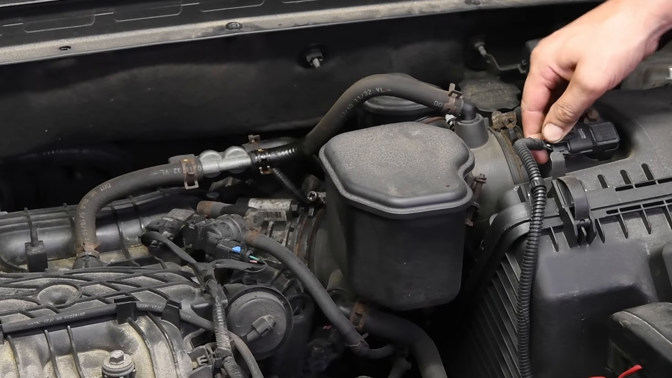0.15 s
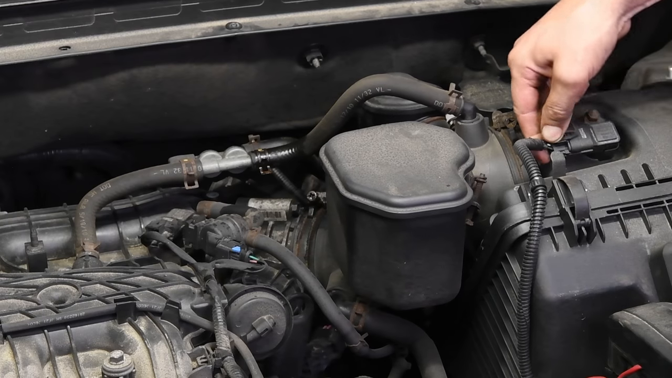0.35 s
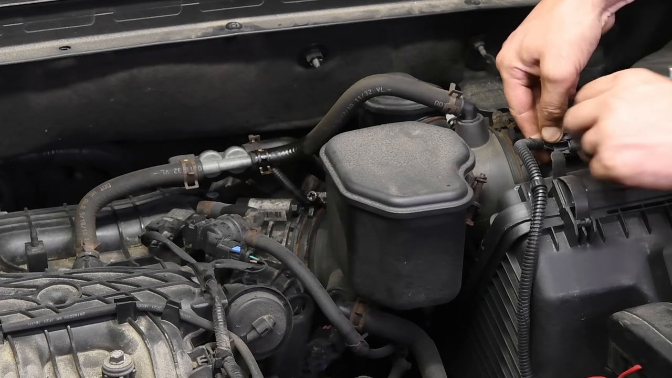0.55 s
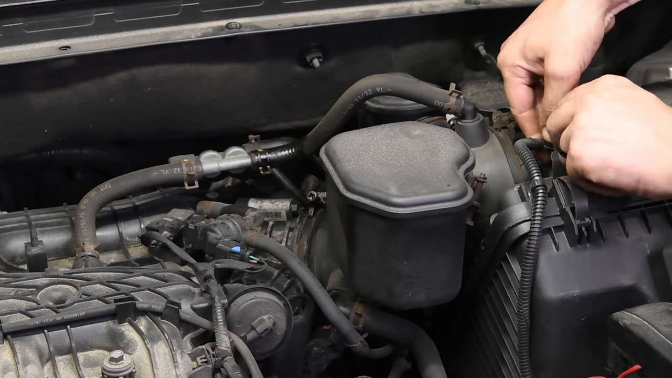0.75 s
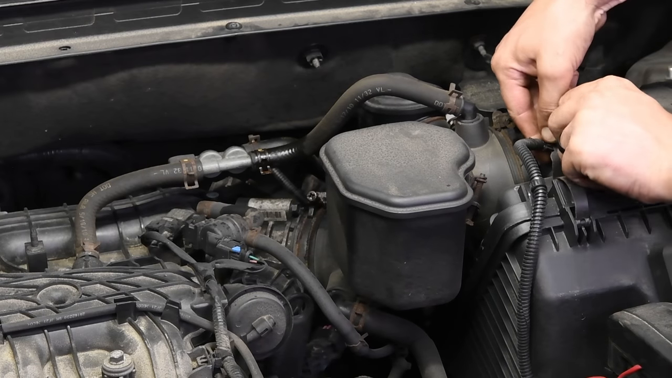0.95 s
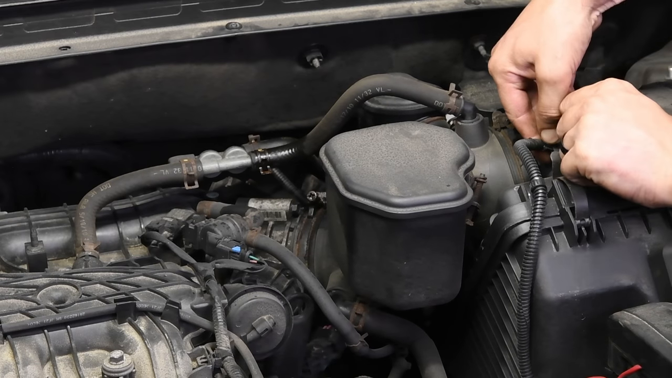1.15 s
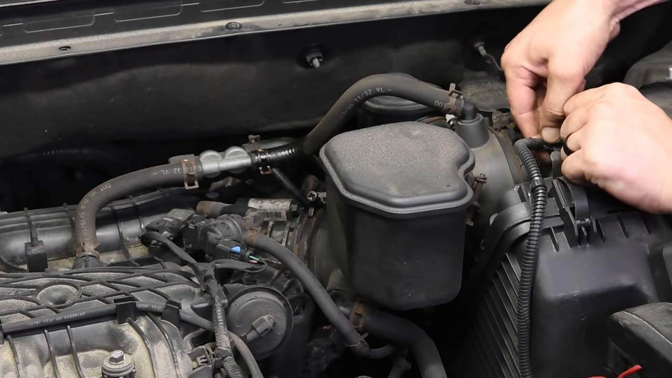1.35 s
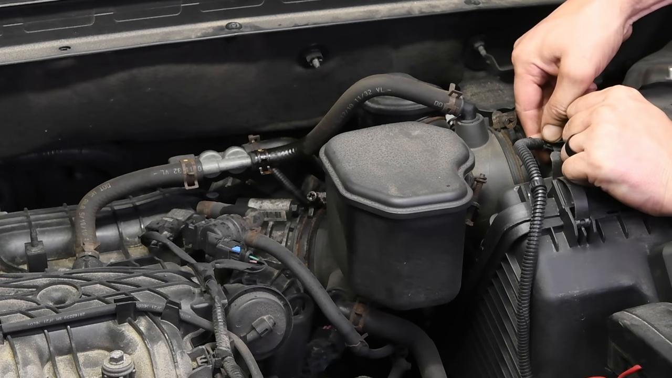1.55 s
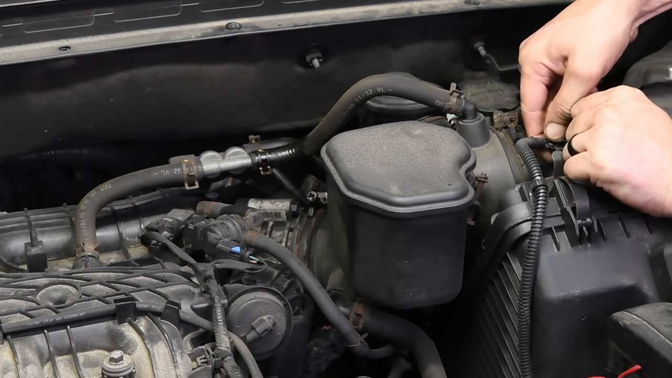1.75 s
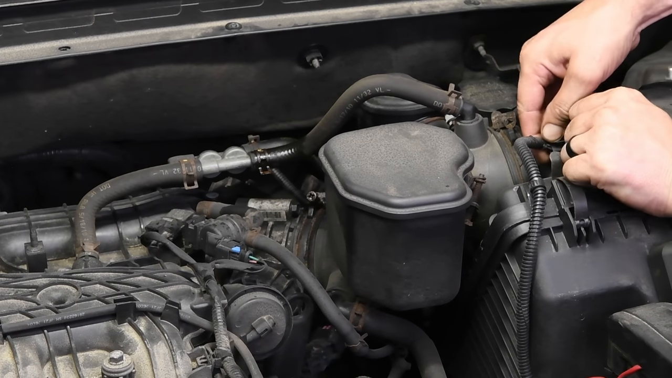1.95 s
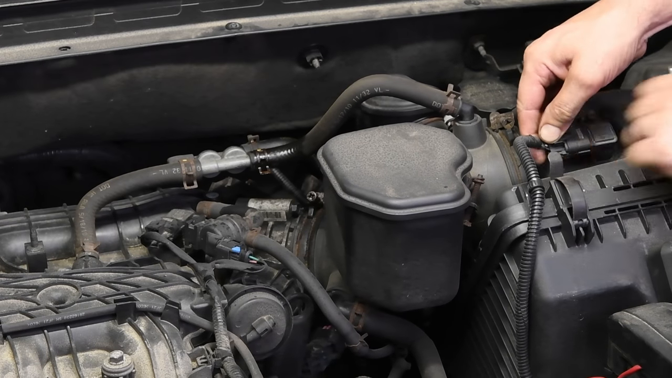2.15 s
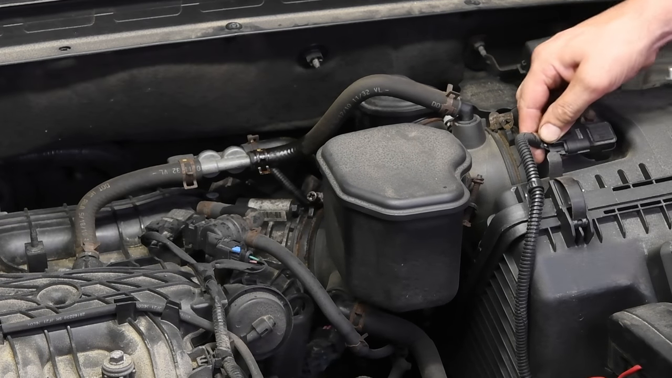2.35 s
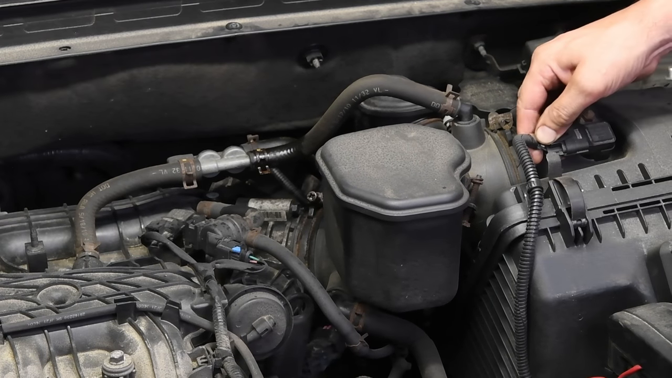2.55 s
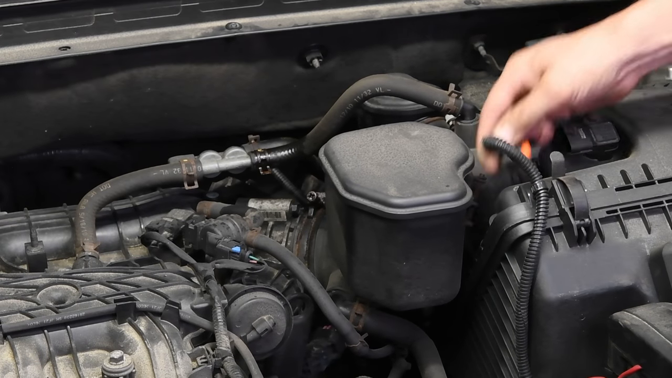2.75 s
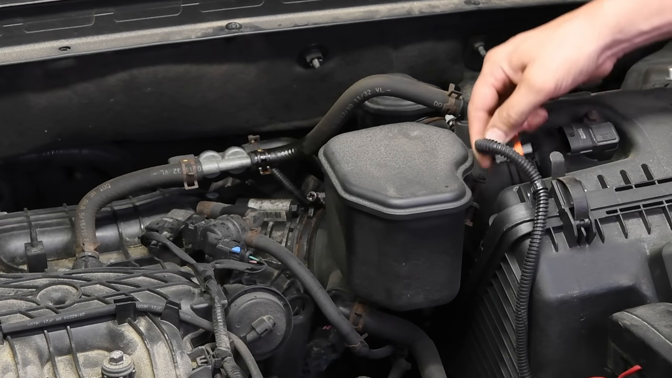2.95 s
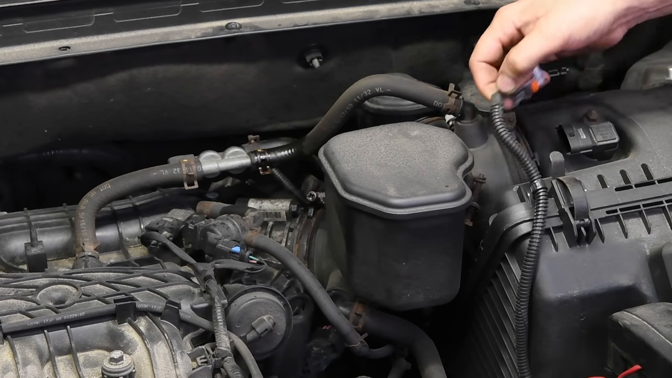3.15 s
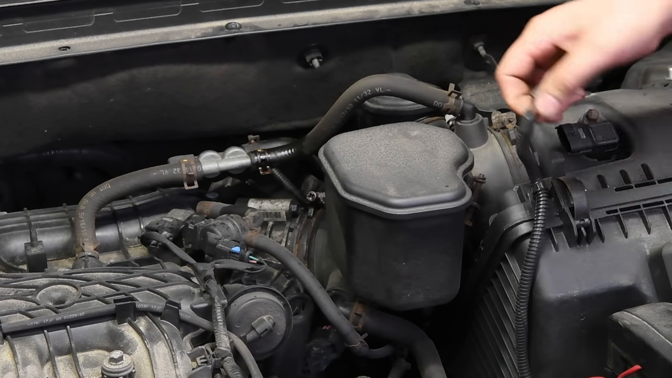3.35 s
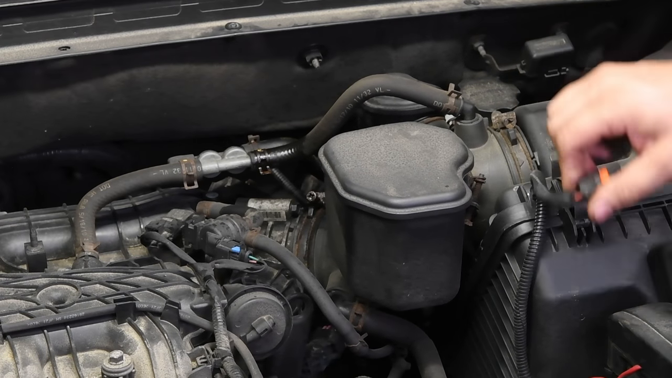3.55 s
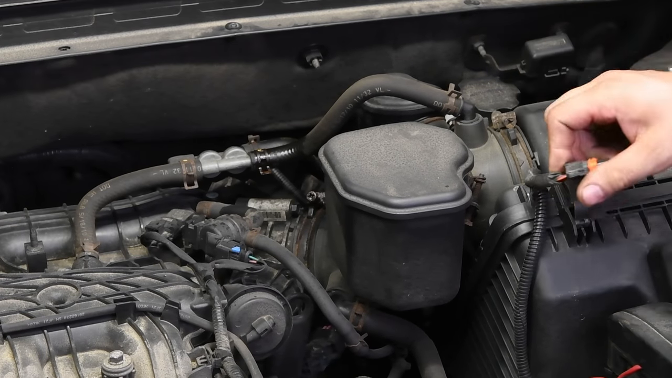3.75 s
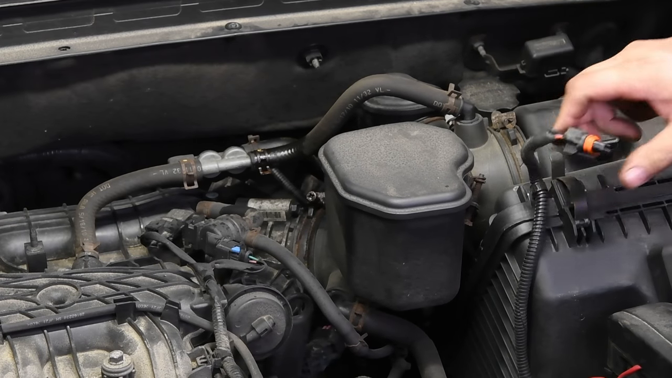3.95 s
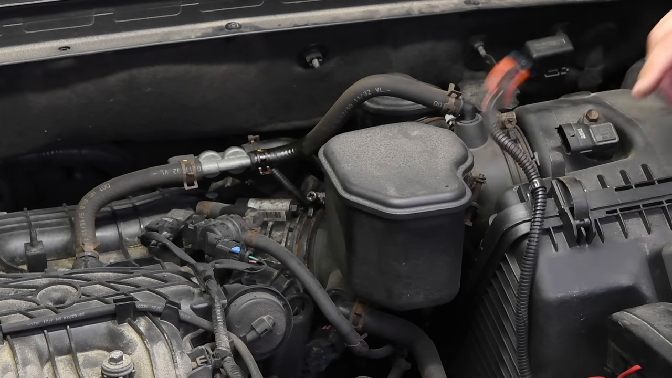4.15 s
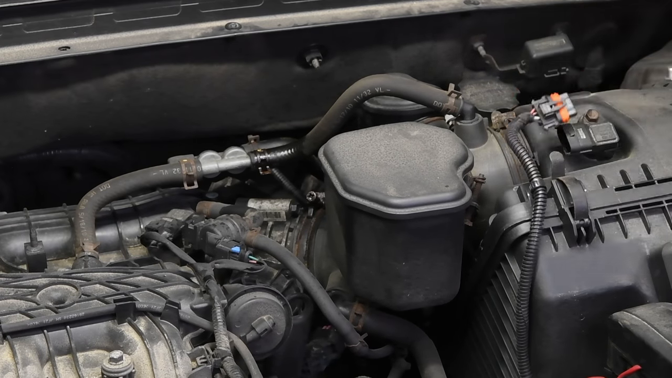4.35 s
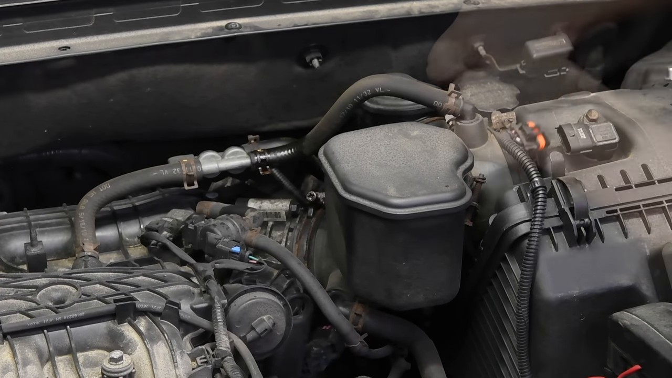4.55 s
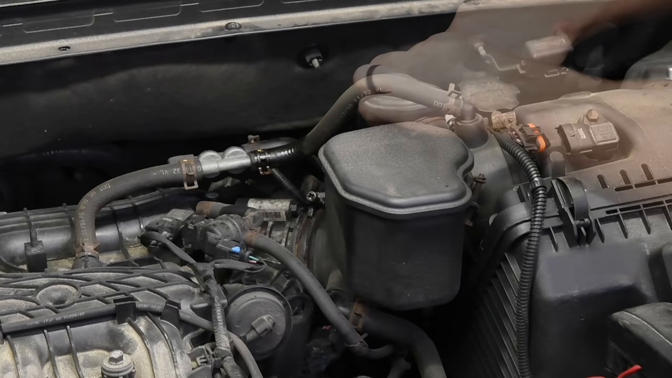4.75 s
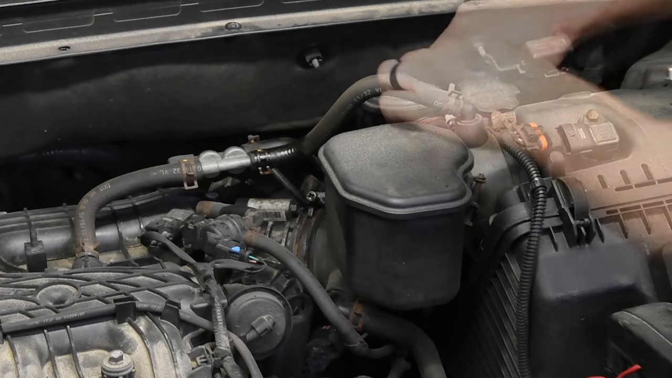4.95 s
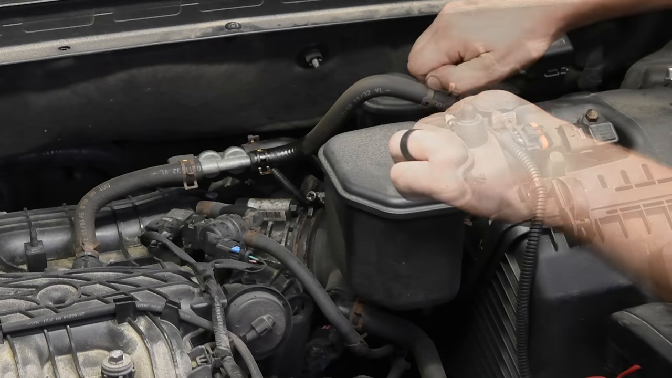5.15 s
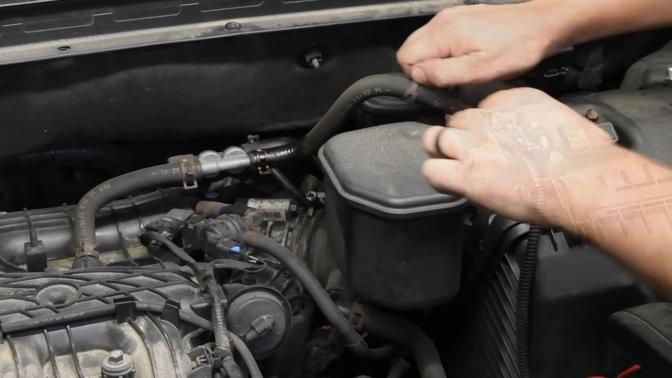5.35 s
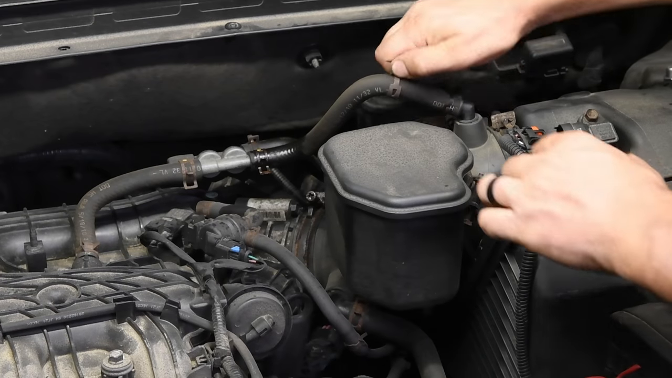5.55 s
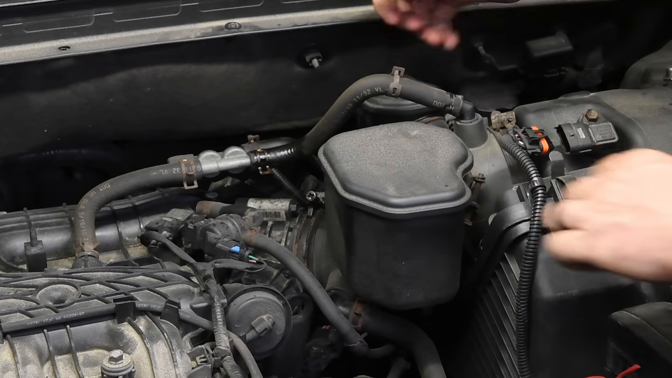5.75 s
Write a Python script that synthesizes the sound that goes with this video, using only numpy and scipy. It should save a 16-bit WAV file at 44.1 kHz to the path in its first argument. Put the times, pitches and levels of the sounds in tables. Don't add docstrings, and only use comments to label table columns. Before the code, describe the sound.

Hands work on a still engine in a workshop, heard close and centred. Light muffled taps lead to a bright plastic snap, a rapid hollow rattle, spaced single clicks, then a falling plug's clack and bounce. Quieter tapping and short hose drags follow. Low hiss runs throughout, with a distant, blurred cricket chirping about every half to one second.

```python
import sys
import numpy as np
from scipy import signal
from scipy.fft import rfft, irfft, next_fast_len
from scipy.io import wavfile
from scipy.ndimage import uniform_filter1d, map_coordinates

SR = 44100
rng = np.random.default_rng(int(sys.argv[2]) if len(sys.argv) > 2 else 0)


def log_audio(samples):
    frames = np.atleast_2d(samples).T
    limited = np.clip(frames, -1, 1)
    pcm = np.round(limited * 32767).astype(np.int16)
    wavfile.write(sys.argv[1], SR, pcm)


def boost(x):
    u = np.asarray(x, float) / 20
    return 10 ** u


N = 259749
SPAN = 16384
CLOCK = np.arange(SPAN) / SR
HZ = np.fft.rfftfreq(SPAN, 1 / SR)

# frequency [Hz], density [dB per Hz].
HISS_COLOUR = [(12, -56), (20, -42), (38, -7.5), (131, 0), (184, -8.5), (351, -10), (690, -8), (750, -10.5),
               (1280, -11.5), (2440, -10), (12100, -12.5), (15800, -13), (15950, -70)]
# frequency [Hz], density [dB per Hz].
SIDE_HISS_COLOUR = [(12, -38), (32, -8), (108, -7), (135, -3), (184, -4.5), (465, -6.5), (634, -7.5),
                    (709, -8), (4280, -10), (15800, -11.5), (15950, -70)]

# time [s], level [dB].
RUB_PRESSURE = [(0, -68), (.2, -72.5), (.45, -67.5), (.6, -72), (.92, -70.5), (1.02, -74.5), (1.85, -69.5),
                (2.58, -71.5), (2.76, -56), (3.05, -72), (4.1, -74), (4.3, -65.5), (4.55, -71.5),
                (4.8, -70), (4.95, -69), (5.38, -68), (5.5, -69), (5.8, -73.5), (5.89, -75.5)]
# resonance [Hz], width [Hz], level [dB].
BOX_RESONANCES = [(200, 95, 0.5), (405, 113, 3.5), (575, 300, -2), (960, 290, -3.5), (1260, 82, -1.5),
                  (1660, 760, -10)]
# frequency [Hz], density [dB per Hz].
SKIN_COLOUR = [(500, -2), (2000, 3), (4000, 1.5), (9000, -3), (15700, -25), (15950, -70)]
# frequency [Hz], density [dB per Hz].
CLOTH_COLOUR = [(2500, -12), (6000, -6), (8000, -4), (15700, -9), (15950, -70)]
# start of full level [s], hold [s], level [dB].
SKIN_SLIDES = [(.165, 0.11, -71), (.47, 0.05, -76), (2.0, 0.0035, -66), (2.045, 0.0043, -71),
               (2.815, 0.015, -70), (2.98, .004, -75), (5.35, 0.062, -75), (5.5, 0.0046, -79)]
# start of full level [s], hold [s], level [dB].
HOSE_DRAGS = [(1.896, .004, -60), (1.99, 0.0043, -78), (2.104, .004, -88), (4.906, 0.0024, -58),
              (5.064, 0.013, -58), (5.09, 0.29, -75), (5.33, 0.17, -74), (5.66, 0.0026, -54)]
# start of full level [s], hold [s], level [dB].
SLEEVE_WHISKS = [(4.066, 0.081, -63.5)]

# start [s], cavity peak [dB], cavity pitch [Hz], wall peak [dB], wall pitch [Hz].
PLUG_TAPS = [(0.022, -46.5, 448, -49.5, 1260), (0.214, -56.5, 444, -73, 740), (0.653, -69, 740, -57, 860),
             (0.662, -62, 438, -50.5, 860), (0.082, -63, 415, -72, 900), (1.233, -80, 423, -62.5, 853),
             (2.255, -61, 590, -60, 1000), (0.883, -58, 470, -57, 985), (0.912, -62, 680, -65, 895),
             (0.79, -53.5, 415, -48, 875), (0.868, -57, 422, -57, 780), (0.895, -54, 705, -75, 1010),
             (1.4349, -46.5, 450, -51.5, 820), (1.441, -54.5, 423, -69, 796),
             (1.543, -54.5, 500, -80, 1180), (1.887, -50, 436, -73, 880), (1.983, -50, 442, -54, 1060),
             (2.039, -53.5, 395, -56, 1060), (2.09, -49.5, 418, -65, 750), (2.194, -52.5, 443, -57, 1090),
             (2.203, -57, 494.6, -65, 900), (2.225, -56.5, 614, -50.5, 1080), (2.449, -65, 332, -59, 1060),
             (2.952, -63, 333, -55, 1080), (2.968, -56.5, 334, -51, 1290), (2.983, -57, 350, -56, 1100)]
# start [s], cavity peak [dB], cavity pitch [Hz], wall peak [dB], wall pitch [Hz].
HOSE_TAPS = [(4.697, -69, 777, -57, 915), (4.744, -68, 400, -55.5, 974), (4.763, -55, 474, -45, 960),
             (4.773, -50, 390.4, -58, 990), (4.834, -60, 200, -59, 1000), (4.995, -63, 380, -60, 1270),
             (4.892, -67, 400, -48.5, 970), (5.005, -62, 363, -66, 985), (5.045, -74, 380, -53, 920),
             (5.099, -55.5, 374, -59, 1140), (5.254, -72, 398, -65, 1270), (5.307, -69, 403, -64, 1250),
             (5.498, -65, 744, -52.5, 1010), (5.559, -53.5, 400, -52, 1266), (5.567, -57, 303, -54, 1010),
             (5.626, -45.5, 385, -48, 1100), (5.639, -49.5, 370, -64, 730)]
# start [s], cavity peak [dB], cavity pitch [Hz], wall peak [dB], chatter t60 [s].
PLUG_BLOWS = [(1.685, -37, 704, -28.5, 0.0069), (1.692, -30, 467, -54, 0.029),
              (2.627, -51.5, 408, -56, 0.046), (2.654, -42, 710, -39, 0.018), (2.664, -37, 507, -40, .04),
              (2.669, -34, 584, -26, 0.05), (2.678, -27, 418, -42, 0.033), (2.692, -35, 460, -62, 0.022),
              (2.703, -38, 537, -52, 0.046), (2.74, -50, 457, -64, 0.024), (2.787, -51, 300, -56, 0.026),
              (2.797, -43.5, 197, -68, 0.064), (2.809, -44, 517, -55, 0.011),
              (2.826, -47.5, 416, -63, 0.024), (2.831, -52, 714, -62, 0.011),
              (2.889, -47.5, 476, -70, 0.014), (2.906, -47.5, 326, -73, 0.038),
              (4.2, -35.5, 431, -27.5, 0.035), (4.2165, -37.5, 400, -31.5, 0.084),
              (4.259, -50, 603, -53, 0.011), (4.409, -32.5, 680, -35.5, 0.022),
              (4.416, -37, 630, -47, 0.023), (4.427, -37, 623, -38, 0.028), (4.434, -33, 593, -49, 0.037)]

# (start [s], peak [dB], chatter t60 [s]).
FINGER_TICKS = [
    ([(1760, -47), (3000, -1), (5620, 4), (10400, 1), (12800, 5), (16500, -13)], [(1.1727, -41, 0.027), (1.9839, -48.5, 0.033), (2.0911, -52.5, 0.039)]),
    ([(880, -27), (1500, -7), (2330, -16.5), (3740, -8.5), (6050, -16.5), (13000, -21.5), (15200, -28), (16500, -47)], [(.0235, -44, 0.033), (0.0275, -38.5, 0.03)]),
    ([(900, -13), (1600, 2), (2300, -7), (3600, -3.5), (5000, -13), (8000, -17), (16500, -30.5)], [(0.6614, -58, 0.02), (0.7954, -59, 0.018), (0.8744, -55, 0.018), (2.1974, -54, 0.023), (2.2283, -55, 0.031), (2.6269, -56, 0.053), (4.7656, -40, 0.01), (4.8928, -51, 0.031), (5.0459, -52, 0.021), (5.5624, -53, 0.019), (5.6271, -47, 0.026)]),
]
# [s, dB, s].
UNPLUGGING = [
    ([(1000, -9), (1540, -32), (1800, -1.5), (2240, 1), (2980, -3.5), (3280, -1.5), (4700, -12.5), (6880, -1), (8810, -10.5), (12900, -6), (15000, -14), (16500, -62)], [(1.6856, -10.5, 0.012), (1.6866, -18, 0.024)]),
    ([(1000, -6.5), (1700, 0.5), (2330, -0.5), (3600, -10.5), (4360, -4.5), (4750, -8.5), (6440, -12.5), (7150, -18), (13800, -22.5), (15600, -32), (16500, -65)], [(2.6535, -40, 0.0084), (2.6556, -28.5, 0.019), (2.6644, -29.5, 0.037), (2.6718, -17.5, 0.031), (2.7342, -42, 0.03), (2.8994, -49, 0.017)]),
    ([(710, -48), (1200, -6.5), (1530, -18), (2100, -19), (3000, 2), (3400, 0.5), (3900, -8), (5200, -6), (7700, -7.5), (9500, -10.5), (11400, -16.5), (16000, -24), (16500, -41)], [(2.7687, -16, 0.012), (2.7715, -34.5, 0.037), (2.797, -17, 0.01), (2.7995, -30, 0.032)]),
]
# [s, dB, s].
CARRYING = [
    ([(350, -69), (600, -27.5), (2030, -26), (2470, -8.5), (2920, -14.5), (3900, 4.5), (4300, -8), (4940, -4.5), (7380, -6.5), (10400, -20), (12000, -13), (15400, -23), (16500, -53)], [(3.1627, -13, 0.0085), (3.1638, -16, 0.021), (3.4574, -53, 0.028)]),
    ([(350, -61), (600, -33), (2800, -17.5), (3170, -4), (4670, -4), (5370, 2.5), (7490, -1.5), (8480, -13.5), (11200, -8), (14600, -20), (16500, -39)], [(3.5698, -17.5, 0.018)]),
    ([(350, -58), (600, -23.5), (1670, -22.5), (2650, -23), (3260, -5), (4870, 2.5), (6340, -3.5), (7280, 1), (9880, -9), (11300, -19.5), (14000, -17), (16500, -34)], [(4.1042, -48, 0.018), (4.1358, -52, 0.012), (4.1374, -11.5, 0.017)]),
]
# [s, dB, s].
DROPPING = [
    ([(1000, -36), (1700, 15.5), (2460, -7), (2730, 6.5), (4200, -15), (5070, 1), (6690, -6), (11200, -3.5), (15100, -33), (16500, -53)], [(4.2004, -26.5, 0.029), (4.2168, -40, 0.018)]),
    ([(880, -39), (1500, 2), (2260, 4), (2530, -7), (3590, -12), (4570, 3.5), (5530, -10.5), (8260, -13.5), (9690, -9.5), (10500, -23), (12800, -13), (16500, -51)], [(4.4094, -18.5, 0.019)]),
    ([(880, -11), (1500, -3), (3450, -11), (4480, -18), (5640, -12), (11500, -16), (15700, -36), (16500, -41)], [(4.4278, -26.5, 0.013)]),
]

# frequency [Hz], t60 [s].
SHOP_T60 = [(200, 0.17), (600, 0.34), (2000, 0.47), (5000, 0.49), (9000, 0.41), (15000, 0.24)]
# frequency [Hz], room share [dB].
SHOP_SHARE = [(200, -4.5), (600, -10), (2000, -15), (5000, -15), (9000, -19.5), (15300, -15.5),
              (15800, -70)]
# frequency [Hz], side share of the room [dB].
SHOP_WIDTH = [(200, -35), (1000, -51), (4000, -39), (12000, -31)]

# first wing stroke [s], last stroke [dB], strokes until the loudest,
# level [dB].
CHIRPS = [(0.227, -14, 2.9, -58), (0.931, -3.5, 2.6, -57), (1.348, -1.5, 2, -58.5), (2.241, -1.5, 3, -57),
          (3.019, -9, 2.2, -58.5), (3.812, -1, 2.1, -57.5), (4.537, 4, 1.6, -60), (5.169, -0.5, 2.5, -57)]

# start [s], peak [dB], pitch [Hz], width [Hz], chatter t60 [s].
BOOMS = [(.791, -61.5, 2290, 150, .06), (1.4357, -54.5, 237, 86.4, 0.066),
         (1.6856, -24.5, 1010, 224, 0.0074), (1.692, -40.5, 340, 96, 0.03), (1.704, -46.5, 592, 45, 0.27),
         (1.79, -58, 600, 35, 0.25), (2.629, -45, 210, 120, .1), (2.675, -38, 191, 80, 0.092),
         (2.681, -37.5, 327, 100, 0.1), (2.829, -45, 560, 400, .01), (2.865, -54, 600, 300, 0.0079),
         (2.8831, -44, 377, 300, 0.0039), (3.1665, -58, 205, 120, .14), (3.169, -52, 3600, 300, .5),
         (3.172, -55, 3950, 350, .42), (3.168, -45, 4970, 500, 0.41), (3.181, -54, 5200, 280, .5),
         (4.2008, -28.5, 1100, 250, 0.026), (4.2026, -40.5, 190, 86.5, .11), (4.204, -37, 400, 162, 0.031),
         (4.216, -30.5, 1450, 600, 0.054), (4.4105, -48, 2200, 300, .045), (4.413, -53, 4480, 200, 0.29),
         (4.416, -46, 460, 88, 0.17), (4.422, -53, 2550, 200, 0.38), (4.437, -44.5, 620, 45, 0.5),
         (4.773, -58, 200, 97, .14), (5.061, -58.5, 1280, 120, 0.24), (5.565, -51.5, 175, 110, 0.053),
         (5.643, -46, 171, 86, 0.043)]


def unit(x):
    return x / np.sqrt(np.mean(x ** 2) + 1e-20)


def along(points, hz):
    f, v = np.transpose(points)
    return np.interp(np.log(hz + 1), np.log(f + 1), v)


def curve(rows, column):
    rows = np.asarray(rows)
    return np.interp(np.arange(N) / SR, rows[:, 0], rows[:, column], left=-120, right=-120)


def swells(rows, rise_db_per_s, fade_db_per_s):
    t = np.arange(N) / SR
    gain = np.zeros(N)
    for s, hold, db in rows:
        before = np.clip(s - t, 0, 1)
        after = np.clip(t - s - hold, 0, 1)
        gain += boost(db - rise_db_per_s * before - fade_db_per_s * after)
    return gain


def modes(peaks, f):
    total = 0
    for k, (centre, width, db) in enumerate(peaks):
        damping = 1j * f * width
        total = total + (-1) ** k * boost(db) * damping / (centre * centre - f * f + damping)
    return total


def high_pass(hz):
    return (1j * HZ / (hz + 1j * HZ)) ** 3


def causal(gain):
    ceps = irfft(np.log(gain + 1e-6))
    ceps[1:SPAN // 2] *= 2
    ceps[SPAN // 2 + 1:] = 0
    return np.exp(rfft(ceps))


def noise(response):
    m = next_fast_len(N)
    colour = response(np.fft.rfftfreq(m, 1 / SR))
    return unit(irfft(rfft(rng.standard_normal(m)) * colour, m)[:N])


def wobble(rate):
    knots = rng.standard_normal(int(N * rate / SR) + 4)
    return map_coordinates(knots, [np.arange(N) * rate / SR])


def struck(response, t60, blow, rise):
    chatter = rng.standard_normal(SPAN) * boost(-60 * CLOCK / max(t60, .002))
    chatter *= 1 - np.exp(-CLOCK / max(rise, 1e-5))
    chatter[0] += blow
    chatter = rfft(chatter)
    even = causal(np.sqrt(np.abs(uniform_filter1d(np.abs(chatter) ** 2, size=90))))
    ring = irfft(chatter / even * response)
    return ring / np.abs(ring).max()


def add(out, s, x):
    hz, t, z = signal.stft(rng.standard_normal((2, SPAN)), SR, nperseg=256)
    t60 = along(SHOP_T60, hz)[:, None]
    decay = boost(along(SHOP_SHARE, hz)[:, None] - 60 * t / t60)
    z = z * decay / np.sqrt(t60 * SR / np.log(1e6))
    z[1] *= boost(along(SHOP_WIDTH, hz))[:, None]
    tail = signal.istft(z, SR, nperseg=256)[1][:, :SPAN]
    tail[0, :200] = 0
    tail[:, 0] = 1, boost(-85)
    start = round((s + .0005) * SR)
    out[:, start:][:, :2 * SPAN - 1] += signal.fftconvolve(x[None], tail, axes=1)


def hiss():
    level_db = -66
    mid = boost(level_db - 1) * noise(lambda f: boost(along(HISS_COLOUR, f)))
    side = boost(level_db - 1.5) * noise(lambda f: boost(along(SIDE_HISS_COLOUR, f)))
    return np.array([mid, side])


def rubbing():
    box = noise(lambda f: modes(BOX_RESONANCES, f)) * boost(2.5 * wobble(35))
    hose = noise(lambda f: modes([(390.0, 46, 0)], f) ** 2)
    skin = noise(lambda f: boost(along(SKIN_COLOUR, f))) * boost(0.91 * wobble(44))
    cloth = noise(lambda f: boost(along(CLOTH_COLOUR, f))) * boost(4.7 * wobble(72))
    out = boost(curve(RUB_PRESSURE, column=1)) * unit(box)
    out += swells(SLEEVE_WHISKS, rise_db_per_s=141, fade_db_per_s=820) * unit(cloth)
    out += swells(HOSE_DRAGS, rise_db_per_s=1400, fade_db_per_s=580) * hose
    out += boost(5.0) * swells(SKIN_SLIDES, rise_db_per_s=950, fade_db_per_s=1500) * unit(skin)
    return out


def knocks(out_len):
    out = np.zeros((2, out_len))
    soft_s, hard_s = 0.0017, 0.00015
    top_wall_hz = 948
    contacts = [(*row, 0.031, soft_s) for row in PLUG_TAPS]
    contacts += [(*row, 0.027, soft_s) for row in HOSE_TAPS]
    contacts += [(*row[:4], top_wall_hz, row[4], hard_s) for row in PLUG_BLOWS]
    for s, db, cavity_hz, wall_db, wall_hz, t60, rise in contacts:
        cavity = modes([(cavity_hz, 50, 0), (410, 70, -10), (610, 80, -12)], HZ) * high_pass(87)
        wall = modes([(wall_hz, 250, 0), (1.34 * wall_hz, 400, -10)], HZ)
        wall = wall * modes([(wall_hz, 1200, 0)], HZ)
        air = boost(db) * struck(cavity, t60, blow=6 * hard_s / rise, rise=2 * rise)
        plastic = boost(wall_db - 0.5) * struck(wall, t60, blow=hard_s / rise, rise=rise)
        add(out, s, air + plastic)
    return out


def snaps(out_len):
    out = np.zeros((2, out_len))
    for colour, contacts in FINGER_TICKS + UNPLUGGING + CARRYING + DROPPING:
        body = causal(boost(along(colour, HZ))) * high_pass(colour[0][0])
        for s, db, t60 in contacts:
            add(out, s, boost(db) * struck(body, t60, blow=4.23, rise=0.0001))
    return out


def cricket(count=4):
    stroke_every_s, stroke_s, rise_s, stroke_t60_s = .044, 0.04, 0.0039, 0.29
    grows_db, fades_db = 2.3, 2
    wing_hz, flat_hz, sag_hz_per_s = 4345, 65, 5800
    echo_db, echo_side_db, echo_t60_s = 3.5, -28, 0.49
    out = np.zeros((2, N + 2 * SPAN))
    t = np.arange(SR // 10) / SR
    flutter = boost(1.9 * wobble(110))
    stroke = (1 - np.exp(-t / rise_s)) * boost(-60 * t / stroke_t60_s)
    stroke *= np.clip((stroke_s - t) / 0.0047, 0, 1)
    for s, last_db, loudest, db in CHIRPS:
        start = round(s * SR)
        dry = np.zeros(SPAN)
        for k in range(count):
            off_db = grows_db * max(loudest - k, 0) ** 2 + fades_db * max(k - loudest, 0)
            off_db -= last_db * (k == count - 1)
            sag_hz = sag_hz_per_s * min((k + .5) / 2.5, 1) ** 2 * t
            hz = wing_hz - flat_hz * max(2.2 - k, 0) ** 2 - sag_hz + rng.normal(0, 15)
            tone = np.sin(2 * np.pi * np.cumsum(hz) / SR)
            dry[round(k * stroke_every_s * SR):][:len(t)] += boost(db - off_db) * stroke * tone
        dry *= flutter[start:][:SPAN]
        tail = rng.standard_normal((2, SPAN)) * boost(-60 * CLOCK / echo_t60_s)
        tail *= boost(np.array([[echo_db], [echo_side_db]])) / np.linalg.norm(tail[0])
        tail[0, 0] = 1
        out[:, start:][:, :2 * SPAN - 1] += signal.fftconvolve(dry[None], tail, axes=1)
    return out[:, :N]


def booms(out_len):
    out = np.zeros((2, out_len))
    for s, db, hz, width_hz, t60 in BOOMS:
        body = modes([(hz, width_hz, 0)], HZ) * modes([(hz, 4 * width_hz, 0)], HZ) * high_pass(134)
        add(out, s, boost(db) * struck(body, t60, blow=0.27, rise=0.00053))
    return out


def scene():
    room_for_tails = N + 2 * SPAN
    contacts = knocks(room_for_tails) + snaps(room_for_tails) + booms(room_for_tails)
    mid, side = contacts[:, :N] + cricket() + hiss()
    mid = mid + rubbing()
    return np.array([mid + side, mid - side])


def low_pass(x):
    return signal.sosfilt(signal.butter(12, 16840, fs=SR, output="sos"), x)


def record(dry):
    top_hz = 16780
    m = next_fast_len(N)
    passed = np.fft.rfftfreq(m, 1 / SR) < top_hz
    band = irfft(rfft(dry, m) * passed, m)[:, :N]
    return low_pass(band)


dry = scene()
out = record(dry)
log_audio(out)
```